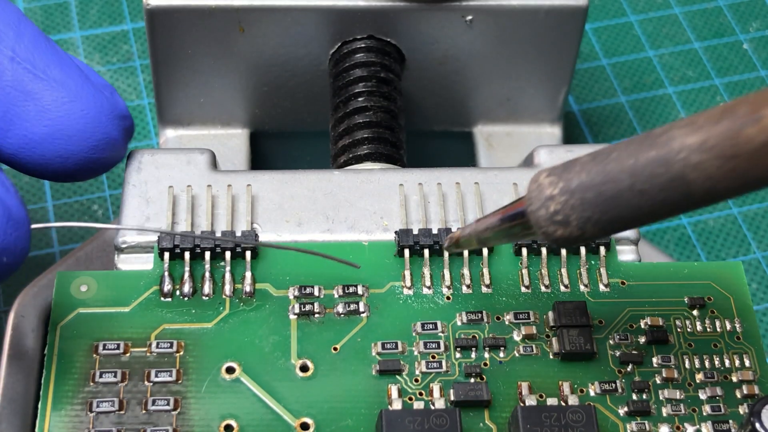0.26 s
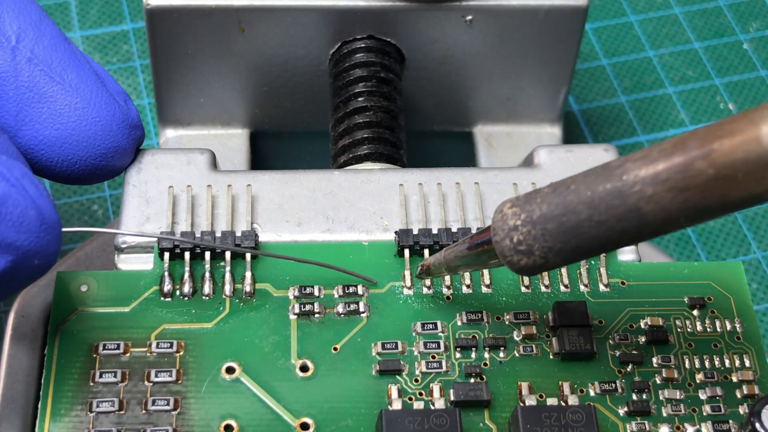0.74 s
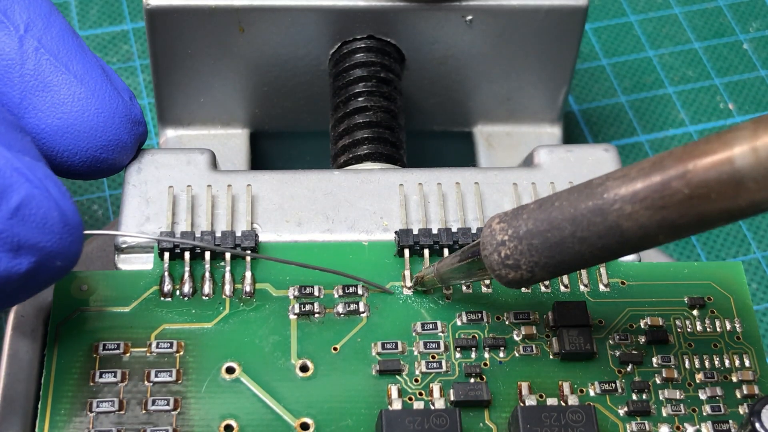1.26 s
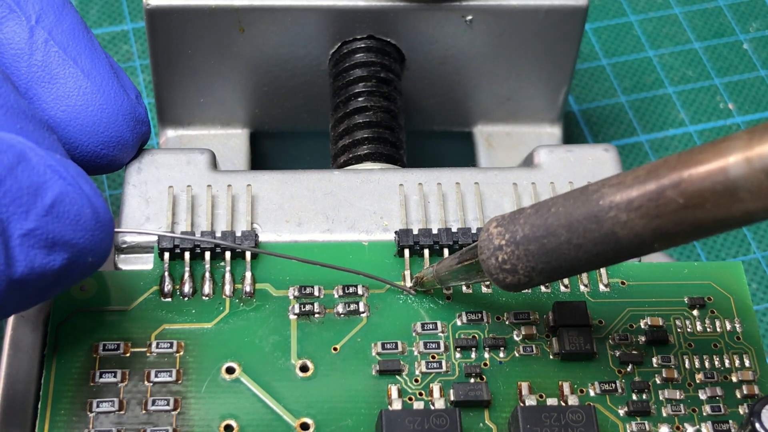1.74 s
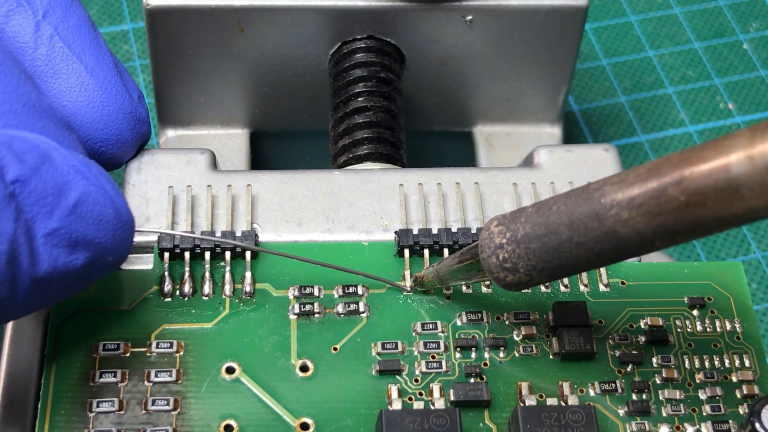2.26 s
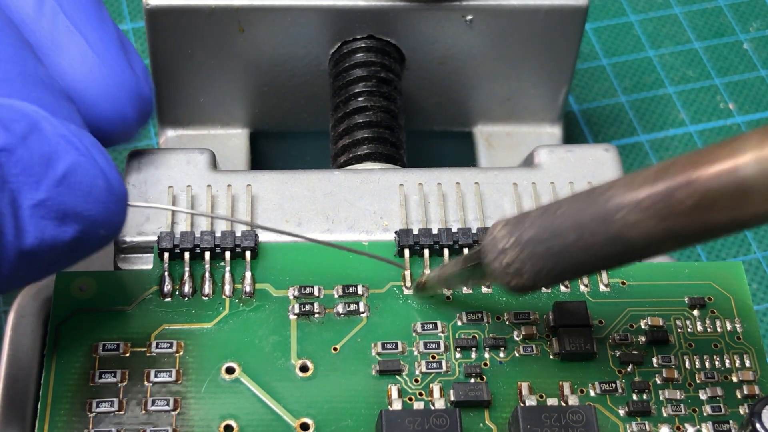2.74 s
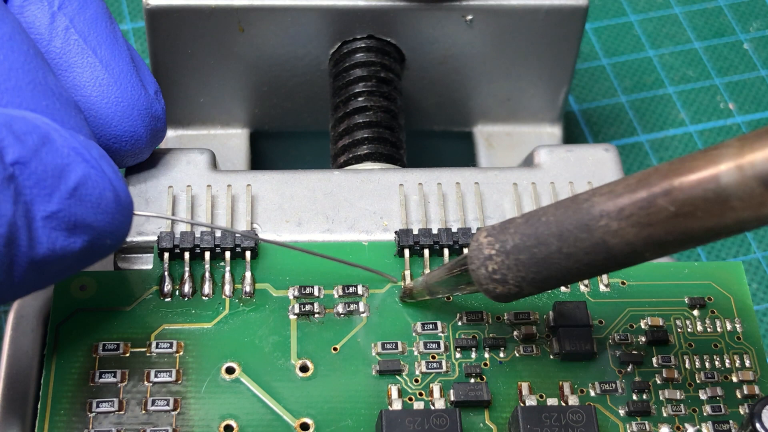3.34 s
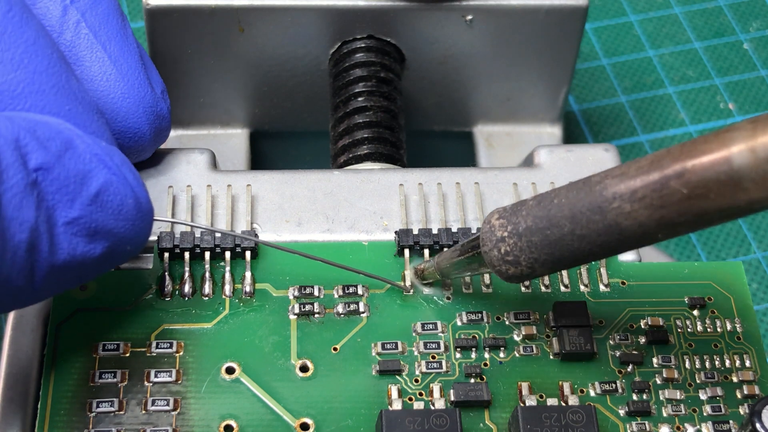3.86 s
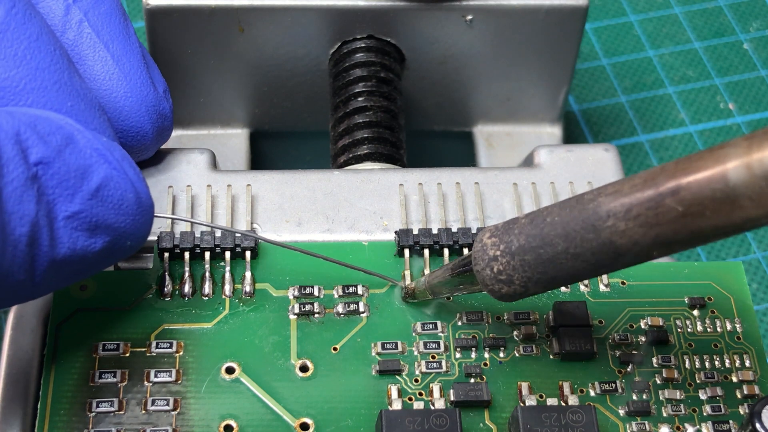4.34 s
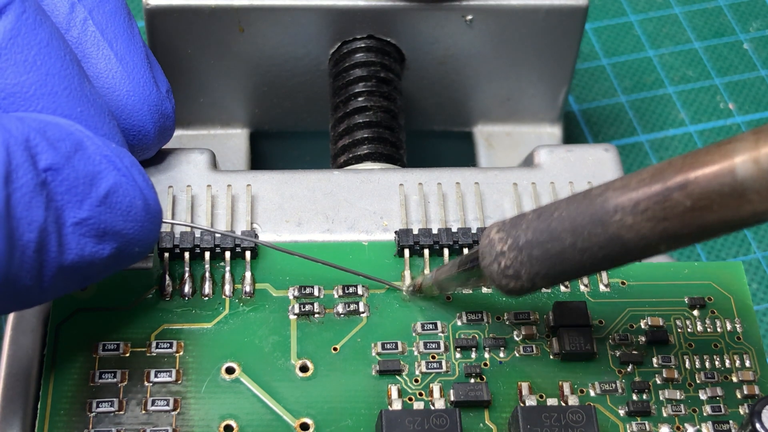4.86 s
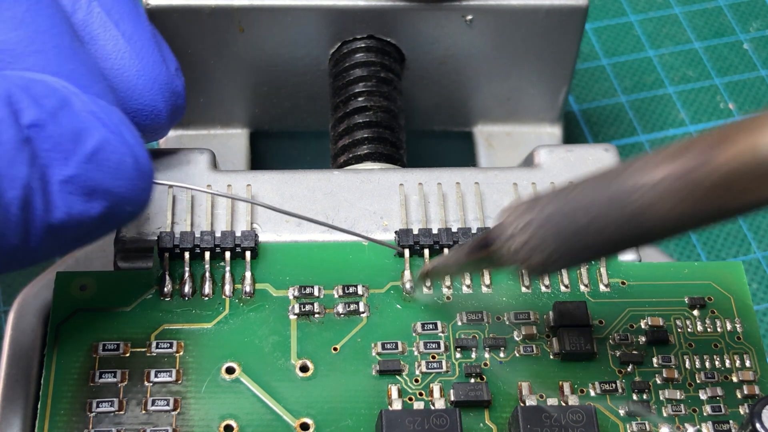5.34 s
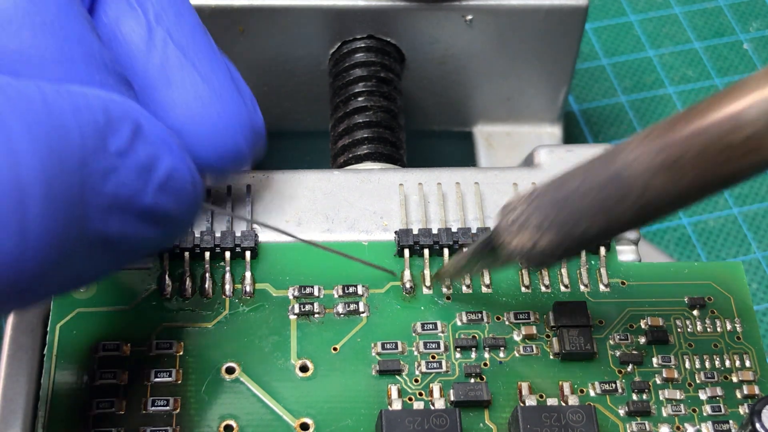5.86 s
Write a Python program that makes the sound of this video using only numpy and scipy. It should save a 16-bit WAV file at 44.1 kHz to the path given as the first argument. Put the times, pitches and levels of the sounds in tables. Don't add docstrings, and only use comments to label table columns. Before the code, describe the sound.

Soldering iron tip ticks and knocks on circuit board pins while flux faintly sizzles, spits and pops over a low room rumble.

```python
import sys
import numpy as np
from scipy import signal
from scipy.fft import rfft, irfft
from scipy.io import wavfile
from scipy.ndimage import uniform_filter1d

SR = 44100
rng = np.random.default_rng(int(sys.argv[2]) if len(sys.argv) > 2 else 0)


def bounce(signal):
    frames = np.transpose(np.atleast_2d(signal))
    limited = np.clip(frames, -1, 1)
    pcm = np.round(limited * 32767).astype(np.int16)
    wavfile.write(sys.argv[1], SR, pcm)


def volts_from_db(level):
    exponent = np.asarray(level, float) / 20
    return 10 ** exponent


N = 269010

# f/Hz, level/dB
ROOM_SPECTRUM = [(8.8, -38), (15, 3), (65, -10), (179, -22), (207, -23), (277, -27.5), (312, -28.5),
                 (340, -29), (543, -33.5), (972, -41), (1690, -46), (3030, -49), (16000, -54.5)]
# f/Hz, width/Hz, level/dB
WHINE = [(998.4, 12, -79.5), (1496, 10, -82.5), (2985, 8.3, -87), (3630, 11, -95), (4970, 11, -91.5),
         (6130, 15, -90)]
# peak t/s, level/dB, rise/s, fall/s, upper mode level/dB
CREAKS = [
    (0.43, -66.5, 0.049, 0.097, 1),
    (2.464, -61.5, 0.054, .06, -9),
    (4.466, -58.5, 0.026, 0.054, -4),
]
# t/s, metal tick level/dB, board ring level/dB, bench thump level/dB, #
TICKS = [(0.7546, -73, -56.5, -72, 1), (1.1039, -29, -30, -33.5, 0.3), (1.1194, -19, -33.5, -59, 1),
         (1.2174, -58, -50, -51, 0.96), (3.3393, -42, -47.5, -48, 0.23), (3.8313, -46, -43, -49, 0.98),
         (3.8522, -29, -43, -38.5, 0.75), (4.5232, -36, -49, -47, 0.34), (4.553, -44, -42, -55, 0.53),
         (4.5697, -30, -41, -37, 0.24), (4.5759, -45, -30, -34, 0.77), (4.5828, -57, -57, -37.5, 0.59),
         (4.6717, -58, -43.5, -45, 0.98), (4.682, -56, -62, -44.5, 0.54), (5.3094, -62, -57.5, -58, 0.66),
         (6.0674, -43.5, -47, -45, 0.96)]
KNOCKS = [
    (3.226, -41, -34.5, -39, 0.08),
    (3.4993, -34.5, -30.5, -32, 0.27),
    (4.2044, -41.5, -31.5, -32.5, 0.11),
    (4.8288, -36.5, -35.5, -35.5, 0.23),
    (5.9395, -28.5, -27.5, -28.5, 0.18),
    (6.0546, -36.5, -32.5, -36, 0.18),
]
# f/Hz, level/dB at spot 0, level/dB at spot 1, t60/s (time to fade by 60 dB)
BENCH_MODES = [(150, -7.5, -17, 0.18), (197.9, -10, -21.5, 0.57), (301, -13, 7, 0.2),
               (334.3, -9.5, -7.5, 0.16), (400, -3.5, -6, 0.071), (429.3, -1, -9.5, 0.076)]
BOARD_MODES = [(704, -36, -16, 0.03), (688, 3.5, 13.5, 0.093), (742.5, 3.5, 0, 0.15), (820, 4, 0, 0.058),
               (899, -7, -12, 0.27), (953, 6, -28.5, 0.24), (1014, -3, -6, 0.081), (1144, -0.5, -2, 0.092),
               (1170, -28, -11, 0.22)]
UPPER_MODES = [(1600, -19, -19, 0.033), (1701, 8, -8.5, 0.27), (1945, 5, -3, 0.11), (2214, 5, -15, 0.19),
               (2470, 5, -8, 0.073)]
METAL_MODES = [(3740, -3, -15, 0.043), (4600, 0, 1, 0.055), (4830, 1, -2, .05), (4980, 5, -5, 0.065),
               (5510, 1, 0, .04), (5800, -3, -9, 0.044), (6250, 3.5, -14, 0.077), (6690, -18, -9, 0.033),
               (7960, -13, -9, 0.078), (9070, -15, -7, .03), (10000, -12, -23, .03)]
# peak t/s, level/dB, rise/s, fall/s
SIZZLE = [(1.213, -59.5, .14, .03), (1.792, -60, 0.065, .06), (1.89, -65.5, 0.033, .6),
          (2.03, -77, .025, 0.22), (2.372, -65, 0.17, .012), (2.43, -73, .05, .11),
          (2.512, -63.5, 0.051, 0.022), (2.53, -68, .025, .55), (3.24, -70, 0.039, .15),
          (3.294, -62, 0.17, 0.014), (3.375, -60, 0.061, .07), (3.448, -63, .04, .04),
          (3.52, -63, .025, 0.032), (3.78, -68, .03, .55), (3.895, -57.5, 0.067, 0.071),
          (4.01, -66.5, .03, 0.17), (4.065, -57, 0.12, 0.019), (4.09, -86, .025, 0.097),
          (4.356, -65, 0.13, .015), (4.405, -70, .04, 0.2), (4.525, -56, 0.011, 0.028),
          (4.565, -66, 0.066, 0.028), (4.784, -66, 0.36, .03), (4.892, -64.5, 0.07, .08),
          (5.14, -64, .025, .05), (5.45, -70, .15, .15), (5.68, -68, 0.043, .03), (5.71, -69, .03, .4)]
# f/Hz, width/Hz, level/dB
FIZZ = [(7950, 210, 13), (8980, 2100, 10), (10950, 1200, 5), (11700, 640, -1)]
# f/Hz, width/Hz, level/dB
LOW_FIZZ = [(4860, 430, -2.5), (5610, 1500, 0)]
# t/s, peak level/dB, f/Hz
SPITS = [(1.2094, -50, 9360), (1.8083, -49, 7990), (1.89, -52, 10500), (2.328, -44.5, 8000),
         (2.342, -48, 9000), (2.3684, -47, 7000), (2.5092, -44, 11800), (2.6636, -51, 7980),
         (3.2004, -47, 7900), (3.2794, -51, 9520), (3.2894, -51, 9300), (3.3737, -47, 9430),
         (3.3777, -42, 8070), (3.5194, -47, 7930), (3.7747, -44, 7950), (3.8023, -45.5, 7360),
         (3.8824, -46, 11700), (4.0013, -43, 11400), (4.0194, -44, 7700), (4.0394, -45, 10700),
         (4.0532, -57, 7890), (4.0633, -49, 4780), (4.355, -50, 10000), (4.399, -46, 8000),
         (5.3426, -48.5, 6200), (5.4331, -49, 5960), (5.475, -50, 6000), (5.508, -50, 6000),
         (5.84, -50, 5830), (5.885, -46, 5500)]
# first t/s, last t/s, number of pops, last gap / first gap
BUBBLING = [
    (3.571, 3.681, 6, 1),
    (3.714, 3.759, 3, .7),
    (4.098, 4.191, 5, 1),
    (4.282, 4.484, 11, 1.3),
    (4.862, 5.229, 15, 1.75),
    (5.378, 5.45, 3, 1),
    (5.558, 5.789, 7, 1.05),
]
# peak t/s, board ring level/dB, rise/s, fall/s, bench thump share level/dB
SCRAPES = [(3.675, -68, .015, 0.19, 3), (3.8, -61.5, .11, 0.046, -6), (3.83, -54.5, .015, 0.057, -6),
           (3.88, -71, .05, .11, 12), (3.925, -65.5, 0.045, 0.02, 6), (4.082, -57.5, 0.086, 0.072, 3.5),
           (4.524, -51.5, 0.01, 0.06, -18), (4.552, -49.5, 0.068, 0.042, -5), (4.6, -65, 0.02, .04, 18),
           (5.456, -63.5, 0.11, 0.078, -2), (5.55, -64, 0.031, 0.041, 7)]


def level(x, db):
    return x * volts_from_db(db) / np.sqrt(np.mean(x ** 2))


def band(x, hz, width):
    return signal.lfilter(*signal.iirpeak(hz, hz / width, fs=SR), x)


def add(out, s, sound):
    i = int(s * SR)
    out[i:i + len(sound)] += sound[:N - i]


def walk(rate):
    k = int(SR / rate)
    steps = np.repeat(rng.standard_normal(N // k + 1), k)
    smooth = uniform_filter1d(uniform_filter1d(steps, k), k)
    return level(smooth[:N], 0)


def crackle(rate, spread_db):
    clicks = (rng.random(N) < rate / SR) * rng.standard_normal(N)
    return level(clicks * volts_from_db(spread_db * rng.exponential(size=N)), 0)


def swell(s, db, rise, fall):
    late = np.arange(N) / SR - s
    return volts_from_db(db - 20 * np.maximum(-late / rise, late / fall))


def ring(modes, spot):
    hz, bench_db, pin_db, t60 = np.transpose(modes)[:, :, None]
    luck = rng.standard_normal((2, len(modes), 1))
    db = bench_db + spot * (pin_db - bench_db) + 1.2 * luck[0]
    t60 = t60 * (1 - 0.29 * spot)
    t = np.arange(SR // 3) / SR
    tones = volts_from_db(db) * np.sin(2 * np.pi * hz * (1 + .005 * luck[1]) * t)
    y = np.sum(tones * np.exp(-np.log(1000) * t / t60), axis=0)
    y = y * (0.94 + np.exp(-t / 0.014))
    return y / np.abs(y).max()


def air():
    hz = np.maximum(np.fft.rfftfreq(N, 1 / SR), 1)
    room_hz, room_db = np.transpose(ROOM_SPECTRUM)
    shape = volts_from_db(np.interp(np.log(hz), np.log(room_hz), room_db))
    spectrum = shape * rfft(rng.standard_normal(N))
    rumble = irfft(spectrum / (1 + (hz / 150) ** 2), N)
    drift = volts_from_db(0.51 * walk(3.22)) - 1
    hush = level(irfft(spectrum, N) + drift * rumble, -45.5)
    return hush + sum(level(band(rng.standard_normal(N), f, w), db) for f, w, db in WHINE)


def creaks():
    slip = crackle(2700, 0.89)
    lower = level(band(band(slip, 1443, 30), 1480, 99), 0)
    upper = level(band(band(slip, 1603, 50), 1600, 120), 0)
    return sum(swell(*row[:-1]) * (lower + volts_from_db(row[-1]) * upper) for row in CREAKS)


def knocks():
    out, t = np.zeros(N), np.arange(SR // 10) / SR
    for s, metal_db, board_db, bench_db, spot in KNOCKS + TICKS:
        upper_db = board_db + 0.53 * (metal_db - board_db) - 13.5
        chance = rng.standard_normal((4, len(t)))
        push = np.exp(-((t - .0007) / 0.00022) ** 2) - 0.4 * np.exp(-((t - .0003) / 0.00013) ** 2)
        chatter = (0.033 + 0.013 * spot) * chance[0] * np.exp(-t / 0.0084)
        blow = (1 - 0.16 * spot) * push / push.sum() + chatter
        bench = volts_from_db(bench_db + 7.5) * ring(BENCH_MODES, spot)
        board = volts_from_db(board_db + 6.0) * ring(BOARD_MODES, spot)
        add(out, s, -signal.fftconvolve(blow, bench + board))
        crack = 0.07 * chance[1] * np.exp(-t / 0.0046)
        crack[0] = 1
        upper = volts_from_db(upper_db + 2.5) * ring(UPPER_MODES, spot)
        metal = volts_from_db(metal_db - 7.5) * ring(METAL_MODES, spot)
        add(out, s, signal.fftconvolve(crack, upper + metal))
        add(out, s, volts_from_db(upper_db + 6.5) * band(chance[2], 830, 1160) * np.exp(-t / 0.0096))
        buzz = band(band(chance[3], 4470, 1680), 7060, 8100)
        buzz += volts_from_db(-7.5) * spot * band(chance[3], 8400, 4000)
        buzz += volts_from_db(-11) * band(chance[3], 2900, 1200)
        fade = np.minimum(t / .0006, 1) * (np.exp(-t / .0022) + .22 * np.exp(-t / .009))
        add(out, s, volts_from_db(metal_db - 4) * buzz * fade)
    return out


def sizzle():
    grains = crackle(2500, 2.3) + .8 * rng.standard_normal(N)
    high = sum(volts_from_db(db) * band(grains, hz, w) for hz, w, db in FIZZ)
    high = level(band(high, 10000, 6500), 0)
    low = sum(volts_from_db(db) * band(band(grains, hz, w), hz, 3 * w) for hz, w, db in LOW_FIZZ)
    low = level(low, 0)
    surges = sum(swell(*row) for row in SIZZLE) * volts_from_db(1.4 * walk(90) - 4.5)
    return surges * (high + volts_from_db(-5.5) * low)


def pops():
    out, t = np.zeros(N), np.arange(SR // 10) / SR
    spits = [(*row, .03) for row in SPITS]
    for s, peak_db, hz, t60 in spits + bubbles():
        fade = np.exp(-t / .002) + .4 * np.exp(-np.log(1000) * t / t60)
        burst = rng.standard_normal(len(t)) * fade
        burst = band(band(burst, hz, .6 * hz), hz, 1.1 * hz)
        add(out, s, volts_from_db(peak_db - 5.5) * burst / np.abs(burst).max())
    return out


def bubbles():
    rows = []  # t/s, peak level/dB, f/Hz, t60/s
    for first, last, count, slowing in BUBBLING:
        reach = np.cumsum(slowing ** np.linspace(0, 1, count - 1))
        times = first + (last - first) * np.append(0, reach) / reach[-1]
        luck = rng.standard_normal((count, 2))
        for s, (size, pitch) in zip(times, luck):
            rows.append((s, -53.5 + 0.8 * size, 5730 * (1 + .06 * pitch), 0.029))
    return rows


def scrapes():
    clicks = crackle(6000, 1.2)
    slip = clicks * sum(swell(*row[:-1]) for row in SCRAPES)
    thump = clicks * sum(volts_from_db(row[-1]) * swell(*row[:-1]) for row in SCRAPES)
    fade = np.exp(-np.arange(SR // 3) / SR / 0.016)
    board = fade * (ring(BOARD_MODES, .9) + volts_from_db(-7) * ring(UPPER_MODES, .4))
    bench = fade * ring(BENCH_MODES, 0.75)
    out = signal.fftconvolve(slip, board / np.sqrt(np.sum(board ** 2)))
    out[:N] += volts_from_db(-1.5) * band(slip, 6300, 1400)
    out += signal.fftconvolve(thump, bench / np.sqrt(np.sum(bench ** 2)))
    return out[:N]


def scene():
    room_t60_s, room_db = 0.25, -21
    near = knocks() + sizzle() + pops() + scrapes() + creaks()
    t = np.arange(SR // 2) / SR
    fade = np.exp(-np.log(1000) * t / room_t60_s) * np.minimum(t / 0.016, 1)
    tail = rng.standard_normal(len(t)) * fade
    tail = signal.lfilter([1], [1, -.8], tail)
    wet = volts_from_db(room_db) * signal.fftconvolve(near, tail / np.sqrt(np.sum(tail ** 2)))[:N]
    return (near + wet + air())[None]


def roll_off(x):
    return signal.sosfilt(signal.butter(12, 16500, fs=SR, output="sos"), x)


def record(dry):
    top = signal.ellip(8, .2, 30, 15750, fs=SR, output="sos")
    mix = signal.sosfilt(top, dry)
    return roll_off(mix)


dry = scene()
out = record(dry)
bounce(out)
```